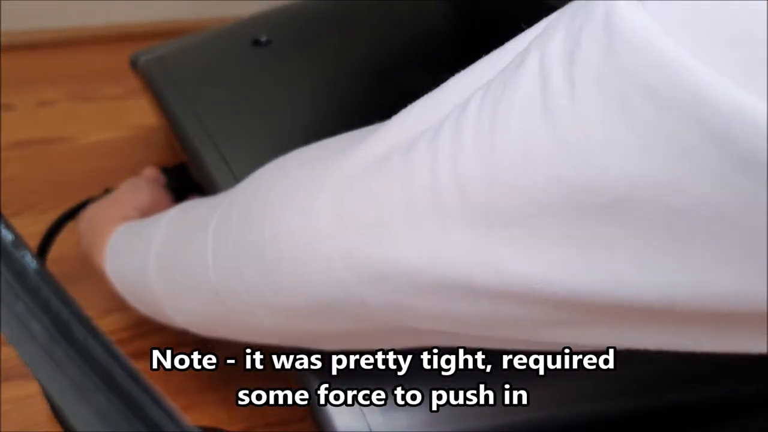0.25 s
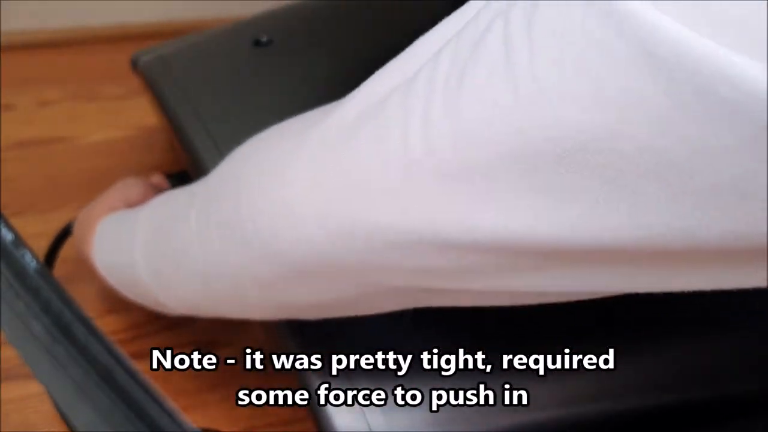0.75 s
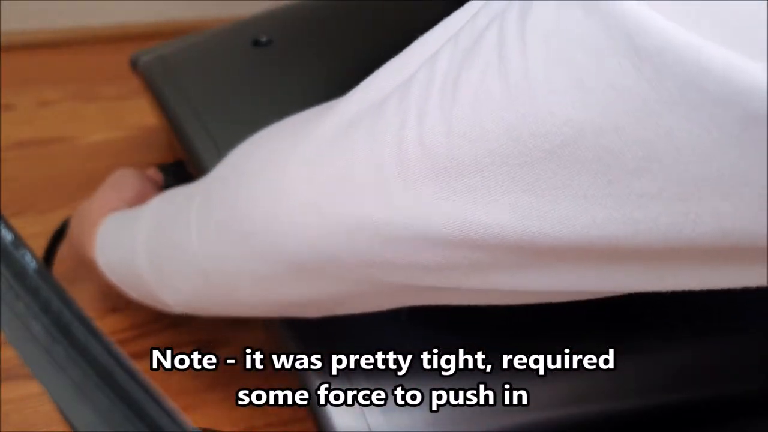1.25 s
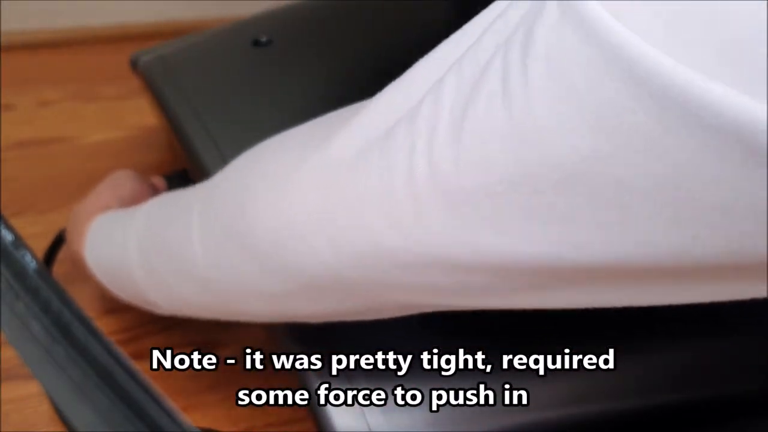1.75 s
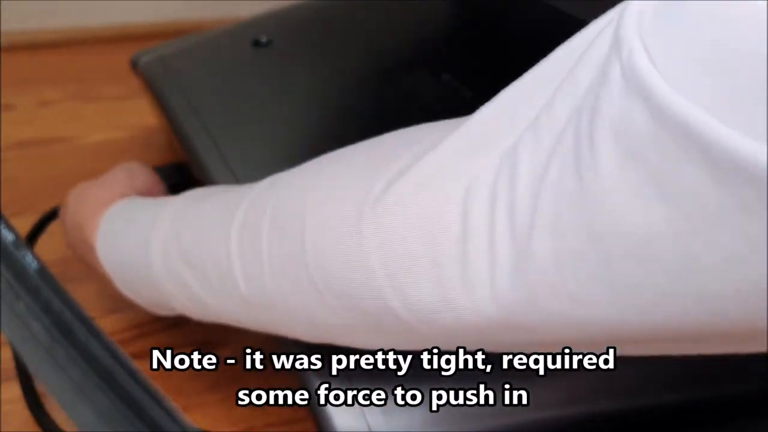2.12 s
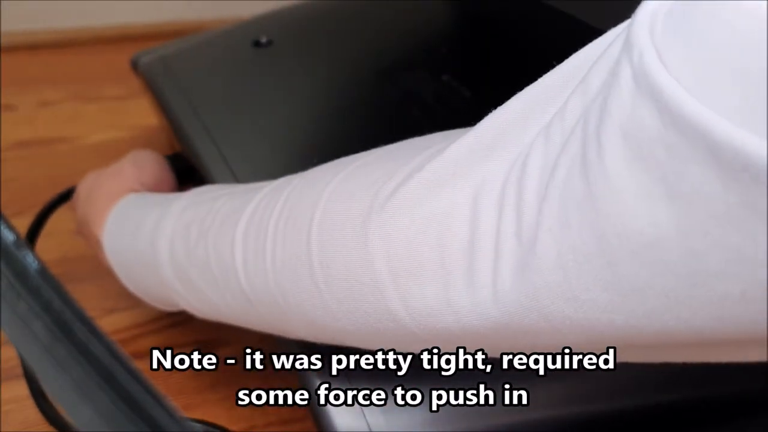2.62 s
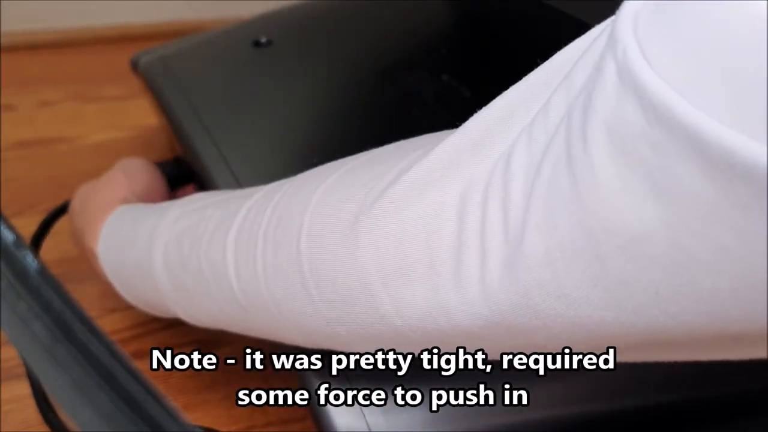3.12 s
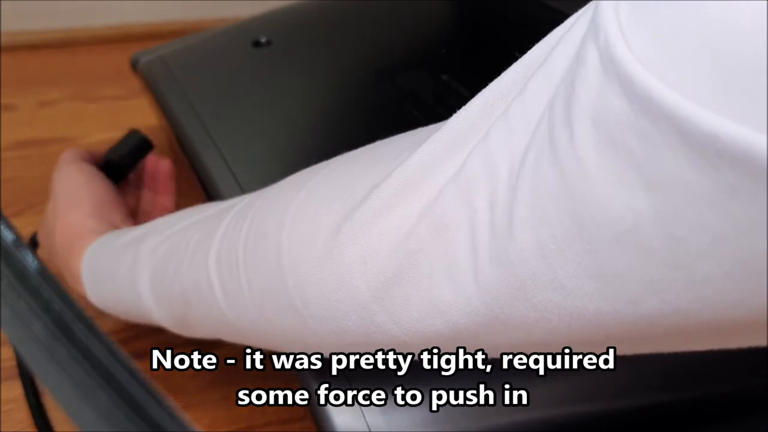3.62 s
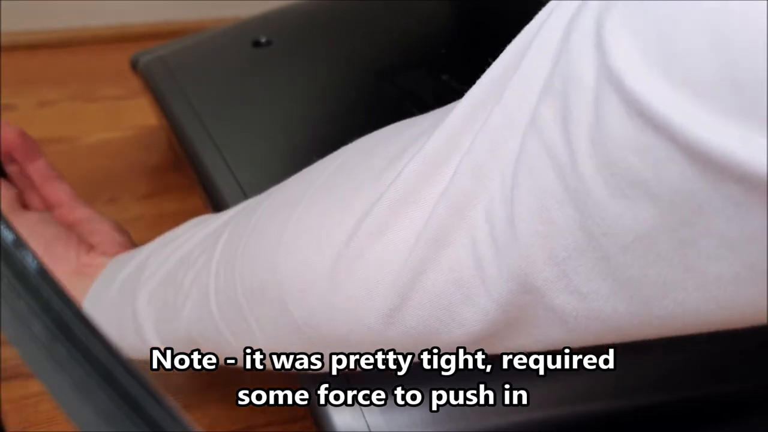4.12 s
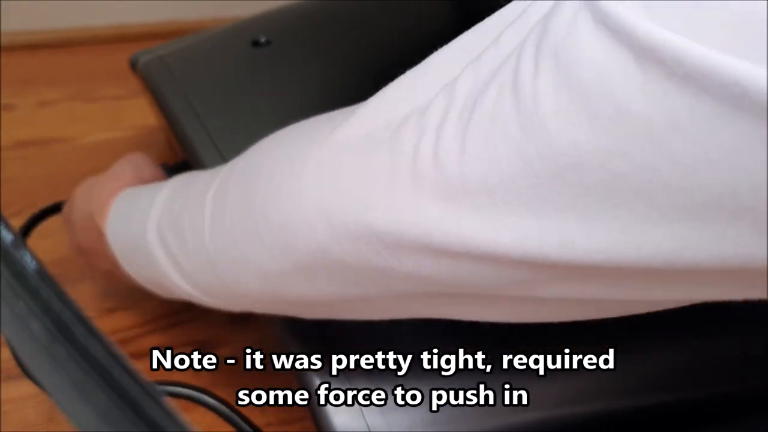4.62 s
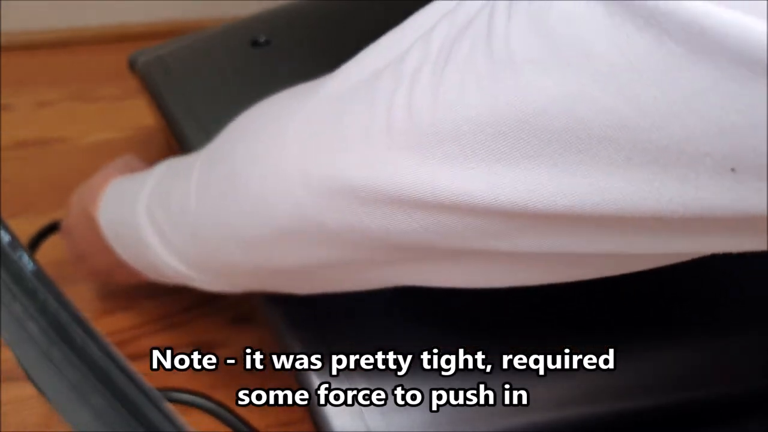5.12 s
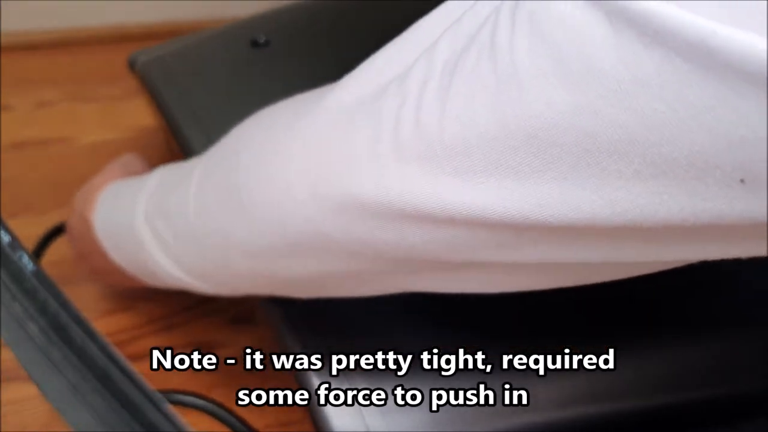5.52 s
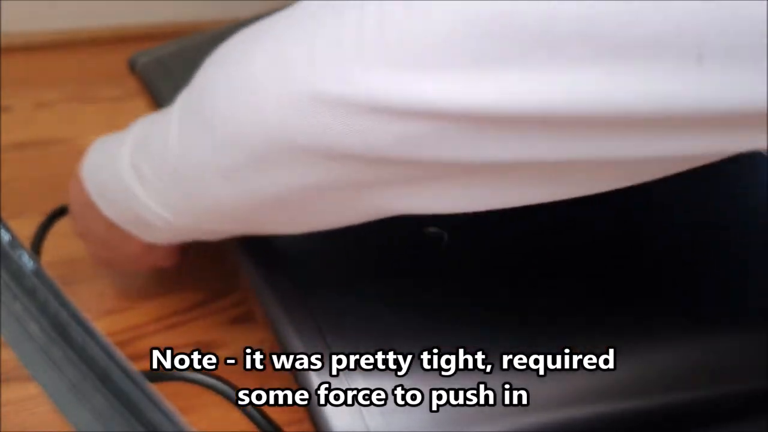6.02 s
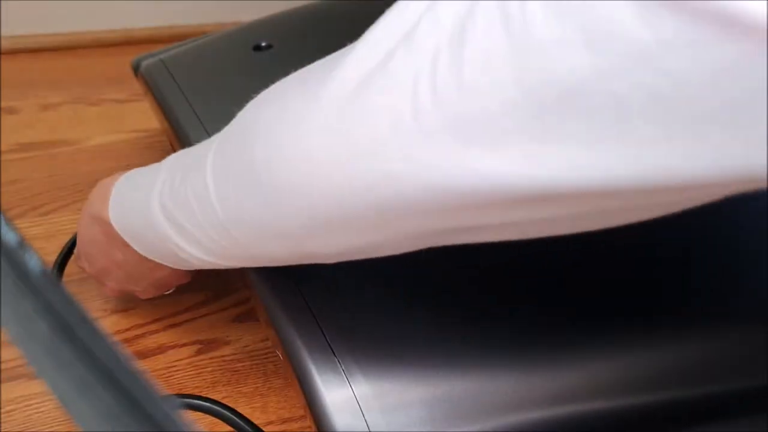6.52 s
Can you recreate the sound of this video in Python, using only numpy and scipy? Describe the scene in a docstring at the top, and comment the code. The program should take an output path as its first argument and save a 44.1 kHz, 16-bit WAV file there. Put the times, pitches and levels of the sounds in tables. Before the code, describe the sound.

Close, dry handling noise in a small room: hollow plastic knocks, dull boom through floorboards, short rubs, soft sleeve swishes and tiny bright ticks of metal pins. It starts busy, thins to near stillness in the middle, then a crisp crack of plug on plastic starts a second round of uneven thuds and scuffs, easing at the end. The stereo microphone is near, with cloth leaning left.

```python
"""Floorboards boom, a hollow plastic housing is bumped and rubbed, and a sleeve rustles near the left port.
A hand is forcing a power plug into a tight socket at the back of the housing, on a wooden floor; pins tick.
Bumps and slips drive decaying modes of boards and housing; ticks, cloth and puffs are shaped noise.
A small quiet room adds a short tail and still air; two microphone ports a hand apart."""
import sys
import numpy as np
from scipy import signal
from scipy.fft import rfft, irfft
from scipy.io import wavfile
from scipy.ndimage import uniform_filter1d

SR = 44100
rng = np.random.default_rng(int(sys.argv[2]) if len(sys.argv) > 2 else 0)


def pcm_store(signal):
    """Save signal as 16-bit PCM."""
    levels = np.round(np.clip(np.atleast_2d(signal), -1, 1) * 32767)
    wavfile.write(sys.argv[1], SR, levels.astype(np.int16).T)


def linear_from_db(decibels):
    """Turn decibels (scalar or array-like) into linear amplitude factors; 0 gives 1."""
    return 10 ** (np.asarray(decibels, float) / 20)


N = 297983


def evened(x):
    """Scales to rms 1."""
    return x / np.sqrt(np.mean(x ** 2) + 1e-20)


def read(points, hz):
    """Interpolates (Hz, value) points on a log-frequency axis."""
    f, value = np.transpose(points)
    return np.interp(np.log(hz + 1), np.log(f + 1), value)


def sides(left_db):
    """Gains of the two ports, left over right by left_db."""
    return linear_from_db(np.array([[left_db / 2], [-left_db / 2]]))


def add(mix, start_s, peak_db, sound):
    """Mixes a two-port sound in at a given peak level."""
    peak = np.sqrt(2 * uniform_filter1d(sound ** 2, 300, axis=1).mean(0).max())
    part = mix[:, round(max(start_s, 0) * SR):][:, :sound.shape[1]]
    part += linear_from_db(peak_db) / peak * sound[:, :part.shape[1]]


def strokes(peak_s, length_s, db, rise, rest_db, flat=1):
    """Amplitude of overlapping strokes: each peaks and is 20 dB down at both ends; flat over 1 holds the peak."""
    t = np.arange(0, N + 64, 64)[:, None] / SR
    away = np.where(t < peak_s, (peak_s - t) / rise, (t - peak_s) / (1 - rise))
    away = away / np.maximum(length_s, .01)
    power = (linear_from_db(db - 20 * away ** flat) ** 2).sum(1) + linear_from_db(rest_db) ** 2
    return np.interp(np.arange(N) / SR, t[:, 0], np.sqrt(power))


def hiss(colour, same, size):
    """Two-port noise of rms 1, coloured per frequency, with small drifting patches."""
    frames, hz = N // (size // 4) + 5, np.fft.rfftfreq(size, 1 / SR)
    a, b, c, d, patches = rng.standard_normal((frames, len(hz), 5)).T
    patches = evened(uniform_filter1d(uniform_filter1d(patches, 9, 0), 9, 1))
    like = np.clip(read(same, hz), -1, 1)[:, None]
    left = a + 1j * b
    right = like * left + np.sqrt(1 - like ** 2) * (c + 1j * d)
    z = np.array([left, right]) * linear_from_db(read(colour, hz)[:, None] + 2.0 * patches)
    return evened(signal.istft(z, nperseg=size, noverlap=size - size // 4)[1][:, :N])


RING_SAMPLES = 12000


def ring(modes, turn, crowd_db, thud_db, lag_samples):
    """Answer of a body at both ports, energy 1: listed modes, weak ones between them, a dead thud under all."""
    t = np.arange(RING_SAMPLES) / SR
    hz, db, t60 = np.transpose(modes)
    crowd = np.geomspace(0.896 * hz[0], 1.12 * hz[-1], num=30) * (1 + 0.02 * rng.standard_normal(30))
    thud = np.geomspace(0.938 * hz[0], 1.026 * hz[-1], num=6)
    random_sign = rng.choice([-1., 1.], len(hz) + len(crowd))
    sign = np.r_[random_sign, (-1.) ** np.arange(len(thud))][:, None]
    db = np.r_[db, np.interp(crowd, hz, db) + crowd_db, np.interp(thud, hz, db) + thud_db][:, None]
    t60 = np.r_[t60, .55 * np.interp(crowd, hz, t60), 16. / thud][:, None]  # the thud dies in a few swings
    hz = np.r_[hz, crowd, thud][:, None]
    phase = turn * hz / hz.max() * rng.standard_normal(hz.shape)  # short waves reach the ports less alike
    decay = sign * linear_from_db(db - 60 * t / t60)
    swing = [decay * np.sin(2 * np.pi * hz * t + side * phase) for side in (1, -1)]
    left, right = np.sum(swing, 1) * (1 - np.exp(-t * hz.min() * 3))
    late_right = np.pad(right, (lag_samples, 0))[:RING_SAMPLES]
    return np.array([left / np.linalg.norm(left), late_right / np.linalg.norm(right)])


# Modes of floorboards, hollow, panel, socket rim and stiff corners.
# Each row: frequency in Hz, relative level in dB, t60 in seconds.
BOARD_MODES = [(55.3, -4, 0.35), (80.55, -1.5, 0.23), (102.6, 5, 0.098), (145.4, -13, 0.19)]
HOLLOW_MODES = [(183.7, -1.5, 0.13), (256.6, -1, 0.13), (301, -0.5, 0.052), (354.1, 2, 0.1),
                (426.4, 5, 0.046), (489.6, -3, 0.12), (586, -5.5, 0.069)]
PANEL_MODES = [(740, 5, 0.024), (870, 1.5, 0.063), (1093, 1, 0.039), (1187, 1.5, 0.067), (1268, -10, 0.057),
               (1407, 1, 0.023)]
RIM_MODES = [(1600, 1.5, 0.053), (1783, 0, 0.053), (2001, -3, 0.051), (2282, -2, 0.054), (2407, -19, 0.056)]
CRACK_MODES = [(2810, 6.5, 0.013), (2878, -2, 0.039), (3315, 1, 0.035), (3496, -6.5, 0.037),
               (4040, 1.5, 0.013), (4385, -4, 0.03), (4740, -26.5, 0.058), (4946, -11, 0.059)]
# Delay of the right port. One entry each for boards, hollow, panel, rim, crack, in samples.
LAG_SAMPLES = [0, 3, 19, 19, 19]


def housing():
    """Boards, hollow, panel, socket rim and stiff corners as they answer a blow at one spot."""
    return [ring(BOARD_MODES, turn=0.059, crowd_db=-19, thud_db=-17.0, lag_samples=LAG_SAMPLES[0]),
            ring(HOLLOW_MODES, turn=0.4, crowd_db=-15.5, thud_db=-6, lag_samples=LAG_SAMPLES[1]),
            ring(PANEL_MODES, turn=1.0, crowd_db=-6.5, thud_db=5.5, lag_samples=LAG_SAMPLES[2]),
            ring(RIM_MODES, turn=0.68, crowd_db=-3.5, thud_db=7.5, lag_samples=LAG_SAMPLES[3]),
            ring(CRACK_MODES, turn=1.0, crowd_db=-5.0, thud_db=10.0, lag_samples=LAG_SAMPLES[4])]


# Left port over right. One entry each for boards, hollow, panel, rim, crack, in dB.
LEFT_DB = [-2, 1.1, -3, 0.9, -.5]
# Arm's weight loading the floorboards. Each row: peak time in seconds, length in seconds, level in dB.
SHOVES = [(0.001, 0.32, -46.5), (0.23, 0.38, -48), (.36, 0.9, -49.5), (0.503, 0.24, -31.5),
          (0.54, 0.21, -50), (0.67, 0.13, -69), (0.776, 0.24, -50.5), (0.887, .15, -55), (1.133, 0.2, -51),
          (1.29, 0.29, -47), (1.64, 0.2, -58), (1.85, 0.37, -67), (2.014, 0.5, -53), (2.255, 0.18, -56.5),
          (2.747, 0.26, -60), (3.083, 0.32, -62.5), (3.39, .12, -46), (3.49, .35, -57.5), (3.58, 0.14, -39),
          (3.72, 0.31, -54), (3.805, 0.14, -53), (3.998, .17, -64), (4.174, 0.089, -30.5),
          (4.232, 0.19, -43.5), (4.475, 0.76, -54), (4.804, .35, -47), (5.065, 0.1, -48),
          (5.191, 0.27, -40.5), (5.427, .25, -42.5), (5.555, .08, -47), (5.663, 0.38, -47),
          (5.743, .12, -60), (5.815, 0.32, -58), (5.902, 0.11, -47.5), (5.972, 0.067, -41.5),
          (6.08, 0.23, -41.5), (6.14, 0.34, -40.5), (6.295, 0.33, -51), (6.415, 0.52, -55),
          (6.615, 0.36, -53)]
# Plug and fingers dragging along the housing.
# Each row: peak time in seconds, length in seconds, hollow level in dB, panels over hollow in dB.
RUBS = [(0.001, 0.25, -59.5, 10.5), (0.16, 0.35, -55.5, -1), (0.21, 0.11, -44.5, -13),
        (0.35, 0.9, -52.5, -10), (0.495, 0.12, -34, -34), (0.518, 0.061, -48, 9), (0.567, .15, -50, -3.5),
        (0.627, 0.083, -64, -4), (0.664, 0.077, -50.5, -17), (0.743, .17, -46, -25),
        (0.863, 0.16, -53, -14), (1.135, 0.13, -52.5, -1), (1.225, 0.66, -64, -4), (1.335, 0.14, -54, -27),
        (1.389, 0.075, -60.5, 3.5), (1.437, .08, -64, -6), (1.5, 0.13, -61, -5.5), (1.66, 0.8, -66, -12.5),
        (1.91, 0.25, -74, -2), (1.976, 0.33, -57, -6.5), (2.217, 0.47, -65, -12),
        (2.736, 0.27, -57.5, -11.5), (3.068, 0.7, -69, -19), (3.264, .3, -77, 2), (3.605, 0.2, -68, 9.5),
        (3.71, 0.23, -63.5, -5.5), (3.806, 0.1, -67, -1), (4.134, 0.047, -52, -3.5),
        (4.22, 0.13, -42.5, -18), (4.433, 0.18, -62, -29), (4.515, 0.56, -54.5, -6),
        (4.646, 0.82, -61.5, -15), (4.797, 0.19, -38.5, -15.5), (5.072, 0.23, -55.5, -8),
        (5.171, 0.11, -38, -16), (5.295, 0.33, -62.5, 4), (5.416, 0.29, -46.5, -27),
        (5.513, 0.074, -57, -4.5), (5.576, .17, -49, -28), (5.627, 0.23, -41, -18),
        (5.751, 0.11, -55.5, -1), (5.9, 0.11, -64, -8), (6.02, .12, -61, 6), (6.065, .25, -46, -9),
        (6.167, 0.34, -60.5, -7), (6.291, 0.18, -44.5, -6), (6.348, 0.3, -61, -2),
        (6.485, 0.61, -60.5, -31), (6.617, 0.38, -62, -5.5)]
# Level between strokes. One entry each for boards, hollow, panels, sleeve (before its gains), in dB.
REST_DB = [-81.5, -93, -95.5, -88.5]
SHOVE_RISE, RUB_RISE = 0.33, 0.32  # share of a stroke spent building up


def push(bodies):
    """Uneven slips under the hand shake boards, hollow, panel and rim."""
    peak_s, length_s, hollow_db, over_db = np.transpose(RUBS)
    efforts = [strokes(*np.transpose(SHOVES), SHOVE_RISE, REST_DB[0]),
               strokes(peak_s, length_s, hollow_db, RUB_RISE, REST_DB[1]),
               strokes(peak_s, length_s, hollow_db + over_db, RUB_RISE, REST_DB[2])]
    slips = rng.standard_normal(N) * (rng.random(N) < 2200 / SR)  # about 2200 per second
    slips *= linear_from_db(4.7 * np.minimum(rng.exponential(1, N), 4))
    boards, hollow, panel, rim = bodies[:4]
    out = np.zeros((2, N))
    for body, effort, left_db in zip([boards, hollow, panel + 0.5 * rim], efforts, LEFT_DB):
        shaken = evened(signal.oaconvolve(slips[None], body, axes=1)[:, :N])
        out += effort * sides(left_db) * shaken
    return out


# Sliding cloth, and short wideband puffs that go with hard bumps.
# Each row: peak time in seconds, length in seconds, level in dB before the gains in sleeve(),
# tautness 0-1 (a taut stroke is brighter and sets in more slowly).
SWISHES = [(0.001, 0.64, -58, 0.38), (0.12, 0.71, -63.5, 0), (0.243, 0.14, -59.5, 0.8),
           (0.285, 0.22, -55.5, 0.54), (0.312, 0.24, -57, 0.35), (0.374, 0.079, -54, 0.5),
           (0.4, 0.037, -54, 0.1), (0.477, 0.18, -77, 0.3), (0.511, 0.1, -54, 0), (0.624, 0.05, -71, 0.4),
           (0.673, .05, -70, .4), (.745, 0.23, -70.5, 0.6), (1.174, 0.17, -72, 0.53),
           (1.28, 0.066, -67, 0.34), (1.413, .15, -80, 0.4), (1.54, 0.14, -71.5, 0.5),
           (1.628, 0.082, -73.5, 0), (1.947, 0.074, -74, 0.3), (2.046, 0.11, -70, 0.47),
           (2.15, 0.34, -70.5, 0.84), (2.223, 0.16, -70.5, 0.3), (2.695, 0.025, -62, 0.28),
           (3.393, 0.029, -92, .03), (3.41, 0.29, -74.5, 0), (4.153, 0.031, -58, 0),
           (4.192, 0.29, -66, 0.12), (4.407, 0.049, -63, 0), (4.504, 0.25, -72, 0),
           (4.657, 0.9, -76.5, 0.2), (4.761, 0.089, -62.5, 0.1), (4.812, 0.066, -61, 0.2),
           (5.068, 0.08, -63.5, 0.6), (5.176, 0.14, -69, .24), (5.287, 0.18, -73.5, 0),
           (5.388, .08, -57, 0.46), (5.453, 0.044, -69, 1), (5.617, 0.19, -63, 0.81),
           (5.74, 0.64, -76, 0.2), (5.987, 0.032, -62, 1), (6.025, .08, -68, 0.5), (6.099, 0.1, -59, 0.2),
           (6.137, 0.049, -61, 0.2), (6.188, .09, -63, .15), (6.283, 0.16, -60, .03),
           (6.32, 0.073, -68, 0.2), (6.396, 0.055, -59, 0.86), (6.421, 0.31, -66, 0.86),
           (6.589, 0.14, -68.5, 0.97), (6.61, .2, -72.5, 0)]
# Spectra of slack and taut cloth. Each row: frequency in Hz, relative level in dB per Hz.
SLACK_COLOUR = [(410, -32), (700, 4.5), (1300, -2.5), (1500, -1), (3740, -7), (4550, -6), (7590, -16),
                (15000, -19), (16000, -26)]
TAUT_COLOUR = [(1470, -42), (2500, -26.5), (4110, 0), (5110, 8.5), (7530, 3.5), (8800, 4.5), (11200, 7.5),
               (13500, -0.5), (16000, -5.5)]
SLACK_RISE, TAUT_RISE = 0.28, 0.69  # share of a stroke spent building up
REST_TAUT = 0.3  # tautness between strokes


def sleeve():
    """Cloth slides in clumped grains, slack and dull or taut and bright; puffs at hard bumps share its noise."""
    peak_s, length_s, db, taut = np.transpose(SWISHES)
    taut = np.clip(taut, .001, .999)
    rise = np.clip(SLACK_RISE + (TAUT_RISE - SLACK_RISE) * taut, .05, .95)

    def effort(share, rest_share):
        """Stroke amplitude of one kind of cloth, by its share of the power."""
        rest_db = REST_DB[3] + 10 * np.log10(rest_share)
        return strokes(peak_s, length_s, db + 10 * np.log10(share), rise, rest_db, flat=1.08)

    slack, bright = effort(1 - taut, 1 - REST_TAUT), effort(taut, REST_TAUT)
    likeness = [(100, 0.2), (16000, 0.035)]  # (Hz, left-right likeness)
    slack_hiss = hiss(SLACK_COLOUR, likeness, size=256)
    taut_hiss = hiss(TAUT_COLOUR, likeness, size=256)
    grains = evened(linear_from_db(1.2 * evened(uniform_filter1d(rng.standard_normal(N), 200))))
    return sides(4.36) * grains * (linear_from_db(6.0) * slack * slack_hiss + bright * taut_hiss)


# Plug against housing. Each row: start in seconds, hollow level in dB, then panel, rim and crack
# over hollow in dB.
BUMPS = [(0.003, -34.5, -10, -16, -28), (0.068, -44.5, -16, -4.5, -6), (0.212, -46.5, -24, -22, -9),
         (0.362, -38.5, -4, -12, -6), (0.374, -32.5, -7, -5, -0.5), (0.387, -22.5, -15.5, -20, -31),
         (0.457, -35, -7, -10, -13), (0.494, -22.5, -8, -14.5, -23), (0.511, -27, -11, -32, -14.5),
         (0.526, -30.5, -26, -24, -23), (0.627, -34, -10.5, -19.5, -25), (0.671, -57, -25, -11, -10),
         (0.711, -38.5, -9, -21, -38), (0.866, -54.5, 7.5, -6, -31), (0.877, -48, 1.5, -24, -39),
         (1.09, -45.5, -8.5, -29, -37), (1.134, -39.5, 1, -18, -38), (1.275, -37, -10.5, -19, -43),
         (1.369, -62, -10, -3, -40), (1.41, -47, -11, -11, -41), (1.439, -55, -22, -25, -31),
         (1.63, -52.5, -3.5, -6, -16), (1.725, -64, 8, 7.5, -12), (1.9, -67.5, 3, 3.5, -19),
         (1.94, -47, -5.5, -7.5, -44), (1.963, -41.5, -12, -25, -50), (2.019, -55, -2, -11, -26),
         (2.062, -51, -14, -30, -20), (2.209, -54.5, -8, -8, -10), (2.358, -50, -14.5, -22, -21),
         (2.69, -51, -3, -3, -4.5), (2.756, -40, -37, -37, -41), (2.869, -65, 0, -20, -10),
         (2.909, -80.5, 5, 12, -15), (2.958, -81, 2, 14, -10), (3.008, -51.5, -10.5, -30, -45),
         (3.03, -55, -14, -16, -44), (3.232, -62, 2, -28, -10), (3.269, -67, -4, -23, -30),
         (3.363, -42, 4.5, -3, -1.5), (3.419, -52, -5, -34, -8), (3.457, -50, -17, -39, -32),
         (3.545, -51.5, -1.5, -6.5, -9), (3.61, -41, -3, -13, -15), (3.657, -53.5, -20, -18, -9),
         (3.737, -55, -11, -38, -16.5), (3.795, -61, -10, -8, -10), (3.82, -64, -4, -5.5, -11),
         (4.08, -57.5, -7, -22, -16), (4.155, -28.5, 5.5, 1, 4.5), (4.164, -30.5, 6, 4, 4.5),
         (4.279, -42.5, 4.5, 2.5, -3.5), (4.393, -25.5, -7.5, -27, -39), (4.443, -38.5, -14, -17, -24),
         (4.503, -47.5, -0.5, -33, -35), (4.585, -54, 0.5, -1.5, -11), (4.6, -56, 2, -1, -14),
         (4.756, -28, -14.5, -22.5, -31), (4.773, -23.5, -16, -33, -32), (4.915, -45, -6, -30, -33),
         (5.061, -55, 2, -18.5, -31), (5.159, -33.5, -16.5, -35, -41), (5.263, -47.5, -0.5, -0.5, -17),
         (5.294, -47, -20, -14, -28), (5.348, -27.5, -7.5, -16.5, -49), (5.379, -26.5, -7.5, -14.5, -19.5),
         (5.44, -33.5, -17, -20, -26), (5.548, -36.5, -2, -20, -23.5), (5.563, -56, -8, -14, -21),
         (5.601, -41, -24, -34, -34), (5.639, -39, -16, -26, -32), (5.713, -49, -2, -10, -20),
         (5.784, -56, 0, -4, -10), (5.893, -53, -11, -9.5, -37), (5.952, -52, -8.5, -5, -19),
         (5.979, -53, -19, -9, -39), (6.035, -34.5, -16.5, -35, -31), (6.086, -33.5, -6, -12.5, -46),
         (6.177, -35.5, -12, -9.5, -23), (6.249, -56.5, -11, -2, -5), (6.285, -40.5, 0, -4, -6),
         (6.36, -49, -2.5, -26, -15), (6.593, -49, -8, -33.5, -21), (6.707, -55.5, -23, -25, -11.5)]
SPOTS = 5  # places where the plug meets the housing
CONTACT_HARD_S, CONTACT_SOFT_S = 0.0078, .011  # a dull bump stays in touch longer; stretched per body


def bumps(spots):
    """Each contact is a short chatter of force; all parts ring from it, each with its own contact time."""
    out, t = np.zeros((2, N)), np.arange(4096) / SR
    chatter = rng.standard_normal((len(BUMPS), 2, len(t)))
    jolts = np.minimum(rng.exponential(1, (len(BUMPS), 1, len(t))), 4)
    chatter *= linear_from_db(1.8 * jolts)  # a few jolts stand out
    chatter[:, :, 8] += 14.  # the first touch
    boards_db = -19.5  # over hollow
    stretches = [0.88, 1.56, 1.38, 1.4, 1.3]  # contact time factor per body
    aparts = [0.0092, 0.05, 1.0, 0.51, 0.17]  # share of separate force at the right port
    for k, (start_s, hollow_db, *over_db) in enumerate(BUMPS):
        force, other = chatter[k]
        soft = np.clip(.12 - over_db[-1] / 55, 0, 1)  # a dull bump builds up, a hard one starts at once
        contact_s = CONTACT_HARD_S + (CONTACT_SOFT_S - CONTACT_HARD_S) * soft
        parts = zip(spots[k % SPOTS], [boards_db, 0, *over_db], LEFT_DB, stretches, aparts)
        for body, db, left_db, stretch, apart in parts:
            blow = np.exp(-t / (contact_s * stretch)) * (1 - soft * np.exp(-t / (contact_s * 0.15)))
            drive = blow * np.array([force, (force + apart * other) / np.hypot(1, apart)])
            add(out, start_s, hollow_db + db, sides(left_db) * signal.fftconvolve(drive, body, axes=1))
    return out


def hump(x, centre_hz, octaves, floor_db):
    """Favours the band around centre_hz."""
    hz = np.fft.rfftfreq(x.shape[-1], 1 / SR) + 1
    gain = linear_from_db(floor_db) + np.exp(-(np.log2(hz / centre_hz) / octaves) ** 2)
    return irfft(rfft(x) * gain, x.shape[-1])


# Metal pins and cord on edges.
# Each row: start in seconds, level in dB, favoured frequency in Hz, decay time constant in seconds.
TICKS = [(0.5004, -47.5, 5200, 0.019), (0.511, -44.5, 5300, 0.0046), (1.619, -59, 6300, 0.0076),
         (1.941, -69, 6370, 0.0085), (2.0445, -54.5, 11900, 0.0055), (2.057, -56, 14500, 0.007),
         (2.6893, -47.5, 11000, 0.0016), (3.3638, -59, 5640, 0.0032), (3.59, -68, 5000, 0.0065),
         (4.16, -38, 5500, 0.0021), (4.291, -73, 5040, 0.0065), (4.441, -54.5, 5100, 0.0096),
         (4.784, -54, 5460, 0.004), (5.159, -64.5, 9000, 0.0044), (5.263, -60.5, 5160, 0.006),
         (5.373, -52, 5370, 0.0064), (5.442, -54, 5330, 0.004), (5.9519, -65, 6200, 0.0051),
         (5.98, -50, 6400, 0.004), (6.021, -57, 6000, 0.015), (6.159, -69, 5950, 0.0043),
         (6.284, -48, 4940, 0.0046), (6.3066, -49.5, 10800, 0.0067)]


def ticks():
    """Metal pins and cord tick on edges: short bright noise bursts with no ring."""
    out, t = np.zeros((2, N)), np.arange(4096) / SR
    bursts = rng.standard_normal((len(TICKS), 2, len(t)))
    high = signal.butter(4, 4600, "highpass", fs=SR, output="sos")
    for (start_s, db, hz, decay_s), (left, other) in zip(TICKS, bursts):
        burst = np.array([left, 0.48 * np.roll(left, LAG_SAMPLES[3]) + 0.56 * other])
        burst = hump(burst, hz, octaves=0.38, floor_db=-12.5) * np.exp(-t / np.clip(decay_s, .001, .03))
        add(out, start_s, db, sides(7.2) * signal.sosfilt(high, burst))
    return out


# Decay of the room. Each row: frequency in Hz, t60 in seconds.
ROOM_T60 = [(100, 0.32), (500, 0.29), (2000, 0.2), (8000, 0.22)]
# Left-right likeness of room tail and air. Each row: frequency in Hz, likeness 0-1.
LIKENESS = [(60, 0.9), (300, 0.65), (700, 0.75), (1500, 0.031), (16000, .05)]


def room(x):
    """Sparse taps of random sign, each band dying at its own speed."""
    taps = np.zeros((2, SR // 2))
    at = np.arange(200, SR // 2 - 20, 20) + rng.integers(0, 20, (2, (SR // 2 - 201) // 20))
    np.put_along_axis(taps, at, rng.choice([-1., 1.], at.shape), 1)
    hz, t, z = signal.stft(taps, SR, nperseg=256)
    like = np.clip(read(LIKENESS, hz), 0, 1)[:, None]  # long waves reach both ports alike
    z[1] = like * z[0] + np.sqrt(1 - like ** 2) * z[1]
    decay = linear_from_db(-60 * t / read(ROOM_T60, hz)[:, None])
    tail = signal.istft(z * decay, SR, nperseg=256)[1]
    return signal.fftconvolve(x, tail / np.linalg.norm(tail[0]), axes=1)[:, :N]


# Spectrum of the still air. Each row: frequency in Hz, relative level in dB per Hz.
AIR_COLOUR = [(15, -21), (25, -16.5), (76, 9.5), (141, -8.5), (363, -2.5), (887, -22), (962, -32),
              (1190, -15.5), (2110, -29), (2840, -22), (7510, -41), (14400, -31), (16000, -44)]
AIR_RMS_DB = -70.5


def air():
    """Still air of the room: steady coloured noise, alike at both ports in the bass."""
    return linear_from_db(AIR_RMS_DB) * hiss(AIR_COLOUR, LIKENESS, size=2048)


def scene():
    """Housing, boards, pins and sleeve in the room, over the still air."""
    spots = [housing() for _ in range(SPOTS)]
    near = bumps(spots) + push(spots[0]) + ticks() + sleeve()
    return near + linear_from_db(-12.0) * room(near) + air()


def roll_off(x):
    """The treble ends steeply here."""
    return signal.sosfilt(signal.butter(12, 16300, fs=SR, output="sos"), x)


def record(dry):
    """Deep bass is filtered out, and everything stops just under 16 kHz."""
    bass_cut = signal.butter(4, 53, "highpass", fs=SR, output="sos")
    thinned = signal.sosfilt(bass_cut, dry)
    thinned = signal.oaconvolve(thinned, signal.firwin(511, 15950, fs=SR)[None], "same")
    return roll_off(thinned)


dry = scene()
out = record(dry)
pcm_store(out)
```